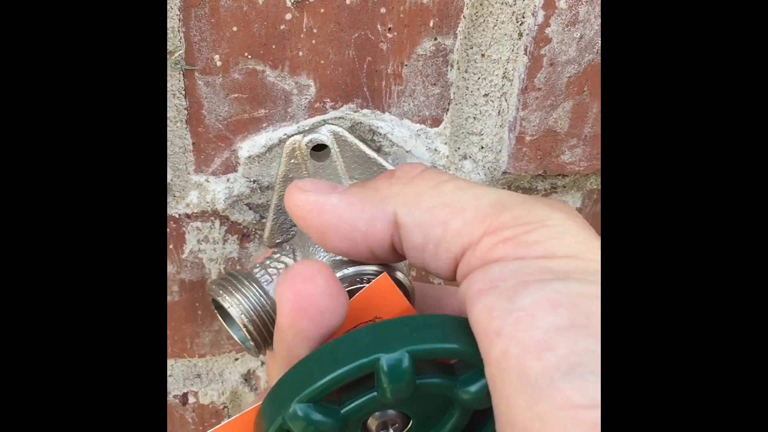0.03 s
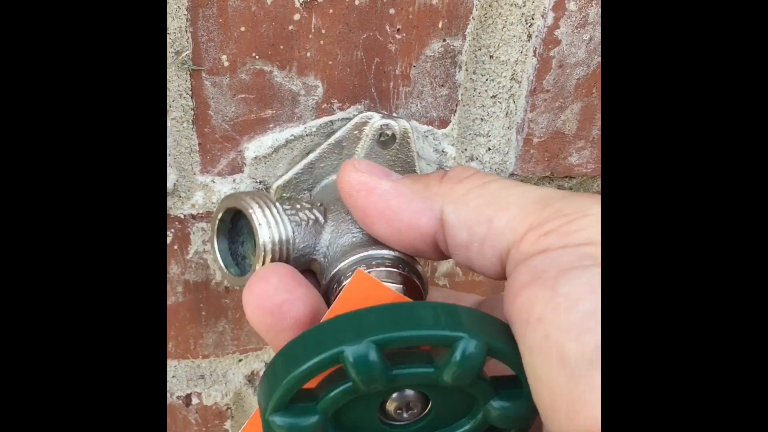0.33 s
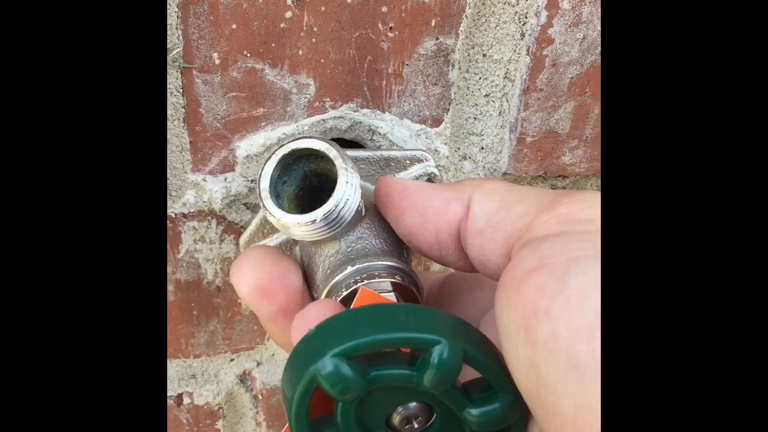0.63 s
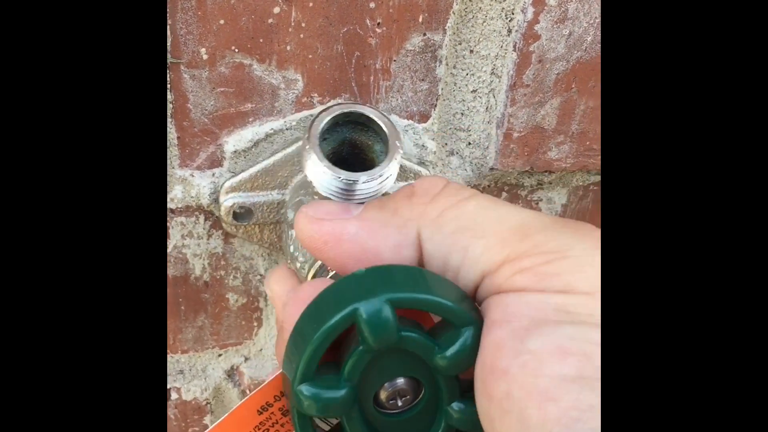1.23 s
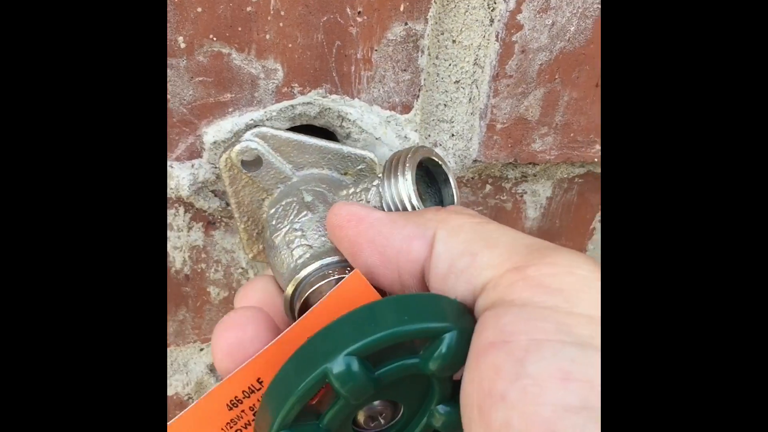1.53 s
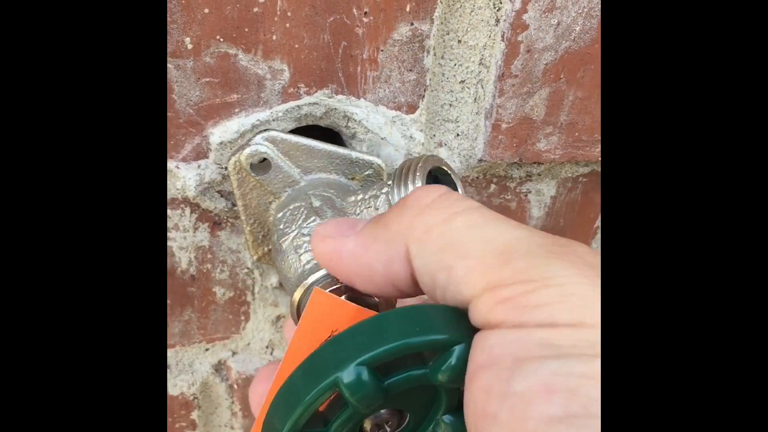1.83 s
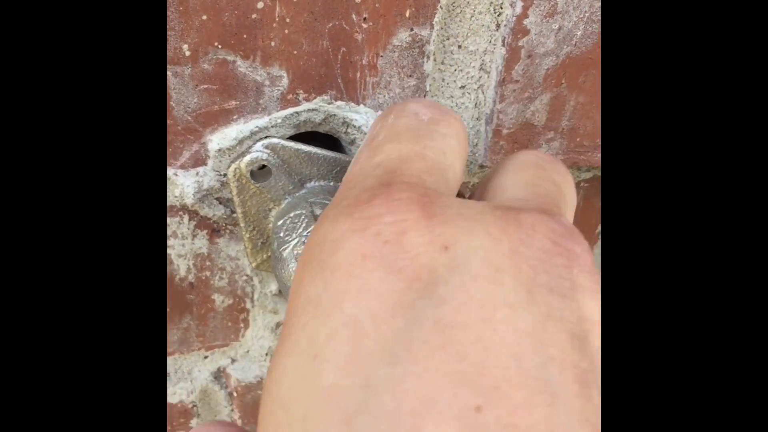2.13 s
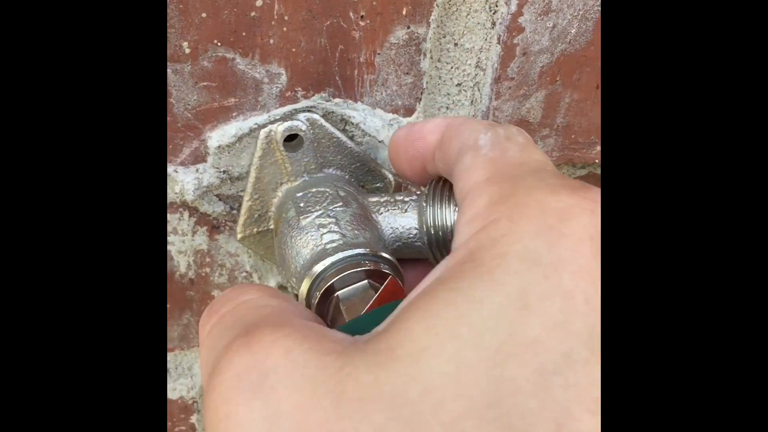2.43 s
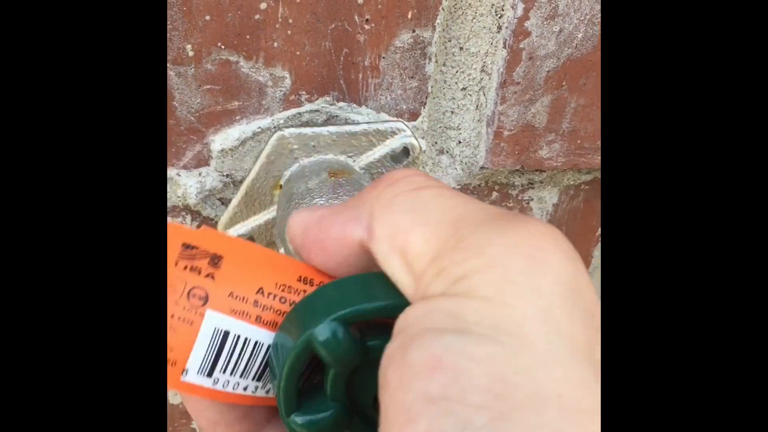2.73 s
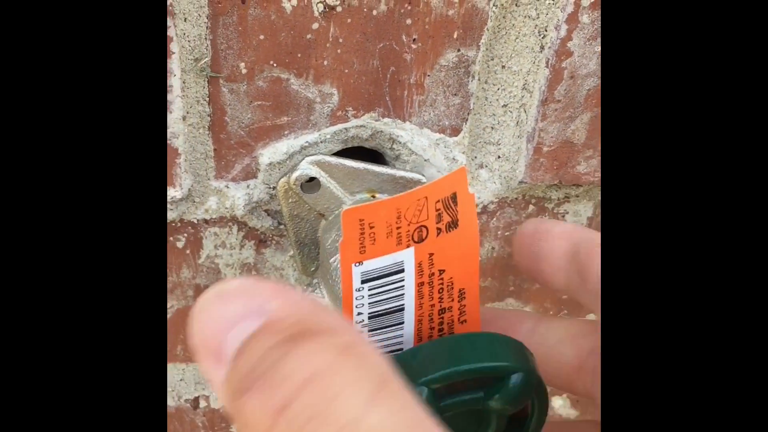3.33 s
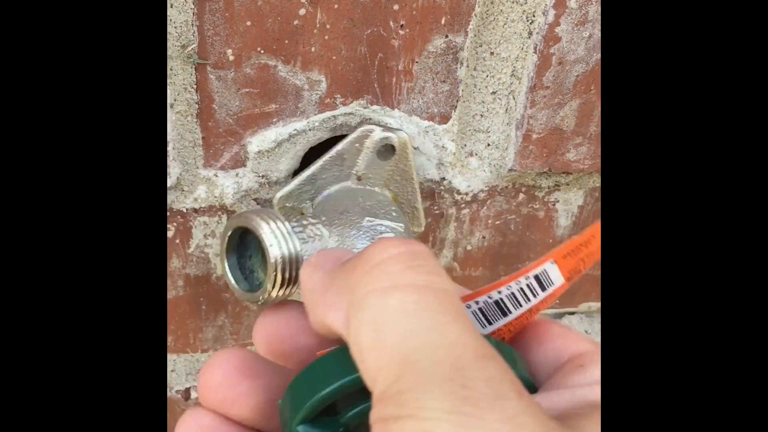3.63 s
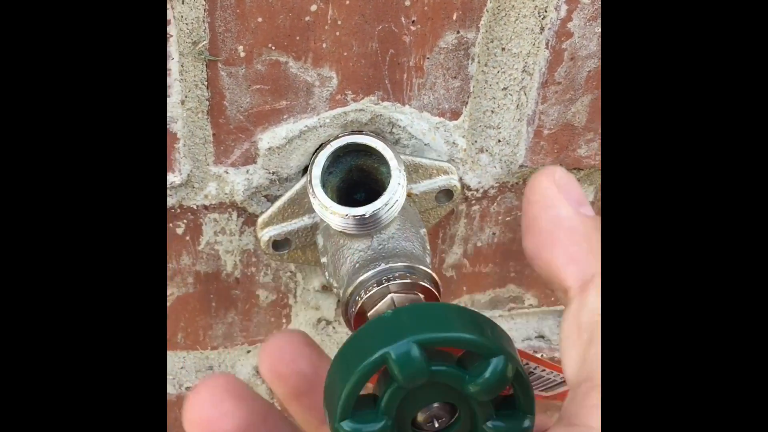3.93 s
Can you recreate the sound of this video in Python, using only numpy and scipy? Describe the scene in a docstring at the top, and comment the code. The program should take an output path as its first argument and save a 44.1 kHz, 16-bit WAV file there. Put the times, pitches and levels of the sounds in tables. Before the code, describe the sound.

A loose metal faucet is twisted in a brick wall, close up, over low outdoor rumble and faint hiss. It scrapes lightly and clinks around 0.5 seconds, then the pipe knocks hard and thuds at 1.5. From 2.2 seconds gritty grinding thickens with ringing clinks, ticks and thin squeaks, up to a second hard knock just after 3. After a short lull, grinding and clinking return from 3.6 to 4.

```python
"""A loose metal faucet is twisted by hand in its hole in a brick wall, close up, over low outdoor rumble.
First its flange scrapes lightly over mortar and clinks, ringing the casting; at 1.5 s the pipe knocks
hard and thuds in the wall. From 2.2 s the grinding thickens, with clinks, thin squeaks and ticks of the
handle and its card tag, up to a second hard knock just after 3 s, while a faint hiss sinks away.
After a short lull, a last bout of grinding, clinking and ticking starts at 3.6 s."""
import sys
import numpy as np
from scipy import signal
from scipy.fft import rfft, irfft
from scipy.io import wavfile

SR = 44100
rng = np.random.default_rng(int(sys.argv[2]) if len(sys.argv) > 2 else 0)


def digitize_waveform(pressure):
    """Quantize a signal to 16-bit integers and store it at the path in sys.argv[1].

    Rows of a 2-D input are taken as channels; values are limited to [-1, 1].
    """
    field = np.atleast_2d(pressure).T
    bounded = np.clip(field, -1, 1)
    quanta = np.round(bounded * 32767).astype(np.int16)
    wavfile.write(sys.argv[1], SR, quanta)


N = 176400

# Twists of the flange on mortar: (start [s], length [s], peak position [0-1], grit level [dB],
# ring level [dB], flange side [0-1], brightness [dB/octave])
TWISTS = [(0, 0.052, 0.7, -54, -76, 1, 3), (0.151, 0.16, 0.3, -54, -74, 0.7, 4.5),
          (0.322, 0.16, 0.3, -59.5, -73, .8, 1.5), (0.457, 0.12, 0.34, -48.5, -60.5, 0.8, -2),
          (0.717, 0.053, 0.4, -60, -74, .5, 3.5), (0.861, 0.055, .5, -65, -64.5, 0.7, 9),
          (1.075, 0.074, 0.47, -52.5, -65.5, 1, 3.5), (1.327, 0.17, 0.18, -56.5, -59.5, .5, -3),
          (2.18, 0.12, 0.88, -49.5, -67, .5, 2), (2.312, 0.086, .35, -49.5, -58, 0.7, 6.5),
          (2.411, 0.063, 0.67, -49, -57, 0.5, -4), (2.478, 0.53, 0.12, -59.5, -64, .1, -5.5),
          (2.674, 0.17, 0.43, -46, -55.5, .1, -1.5), (2.819, .12, 0.56, -42.5, -49.5, 0.6, -3.5),
          (2.928, 0.11, .75, -46.5, -59.5, 0.4, 0), (3.057, 0.1, 0.15, -50, -76, .5, -3),
          (3.622, 0.21, 0.2, -46, -54.5, 0.5, -4), (3.75, .17, 0.53, -43, -54, 0.5, -.5),
          (3.937, 0.045, 0.7, -45, -73, 0.68, 2)]
# EQ of the grit: (frequency [Hz], gain [dB])
GRIT_EQ = [(30, -40), (120, -12.5), (400, 0.5), (750, -5.5), (1270, 1.5), (1600, 1), (2200, -3.5),
           (2780, -3), (3400, -5), (4200, -3.5), (5500, -10.5), (8500, -15.5), (12000, -23.5), (16000, -25)]
GRIT_RIPPLE_DB, GRIT_RIPPLE_HZ = 4.5, 130

def scrape(start, length, peak, grit_db, ring_db, side, tilt_db):
    """One twist: grains crunch under the flange and keep the casting ringing."""
    size = SR // 4
    pressure = np.interp(np.arange(size) / SR / length, [0, peak, 1], [0, 1, 0]) ** 0.82
    force = grains(size)
    sound = casting(force * pressure, side)
    sound *= amp(ring_db) * np.linalg.norm(pressure) / np.linalg.norm(sound)
    grit = colour(ripple(force, GRIT_RIPPLE_DB, GRIT_RIPPLE_HZ), GRIT_EQ, tilt_db)
    sound[:size] += amp(grit_db) * grit * pressure
    return start, sound


def grains(size, per_second=1300, spread_db=1.5, clump_db=3, clump_s=0.00698):
    """Clumped clicks of sand grains catching and breaking."""
    breaks = rng.random(size) < per_second / SR
    strength = np.minimum(rng.exponential(1, size), 4)
    sign = rng.choice([-1., 1.], size)
    return unit(breaks * sign * amp(spread_db * strength + clump_db * wander(size, clump_s)))


# Flange hits on brick: (time [s], drive [dB], flange side [0-1], ring length [x], chatter [s])
FLANGE_CLINKS = [(.470, -52, 0.6, 0.45, .003), (.508, -36, 0.8, 0.57, 0.0032),
                 (0.52, -40.5, 0.7, .5, 0.0016), (.536, -44, 0.8, .5, 0.0023),
                 (1.776, -37.5, 0.52, 0.6, 0.0016), (2.338, -35.5, 0.08, 0.43, 0.0021),
                 (2.350, -46, 0.4, 0.19, 0.0049), (2.4955, -45, 0.5, 0.6, .0012),
                 (2.505, -52, 0, 0.45, 0.0014), (2.542, -44, 0.08, 0.27, 0.0011),
                 (2.554, -47, .1, 0.28, 0.0018), (2.587, -33, 0.38, 0.21, 0.0031),
                 (2.6238, -43, 0.3, 0.54, .0013), (2.668, -31, 0.35, 0.85, 0.0017),
                 (2.674, -23, 0, 0.45, 0.0014), (2.688, -33.5, 0.5, 1.33, 0.0026),
                 (2.744, -44.5, 0.3, 0.43, 0.0016), (2.787, -47, 0.03, .6, 0.0025),
                 (2.810, -39, 0.45, 0.5, 0.00072), (2.826, -40, 0.2, 0.78, 0.0018),
                 (2.854, -33.5, 0.3, 1.53, 0.0011), (2.964, -41, 0.4, 0.68, 0.00095),
                 (3.094, -54, 0.9, .4, 0.0016), (3.137, -44.5, 0.73, 0.53, .002),
                 (3.252, -52.5, 0.6, .4, 0.0014), (3.597, -42, 0.55, 0.3, 0.0057),
                 (3.632, -55, 0.5, .8, 0.0023), (3.673, -56, 0.8, 0.67, 0.0016),
                 (3.714, -43.5, 0.9, 0.55, 0.003), (3.755, -49, 0.9, 0.41, 0.0014),
                 (3.787, -46, 0.7, 1.1, 0.0014), (3.8528, -32.5, 0.8, 0.76, 0.0014),
                 (3.861, -39, 1, 0.93, 0.0023)]

def clink(start, db, side, ring, chatter):
    """The flange slips and chatters against brick for a few milliseconds, ringing the casting."""
    age = np.arange(SR // 30) / SR / chatter
    force = rng.standard_normal(len(age)) * (age * np.exp(-age)) ** 2
    return start, amp(db) * casting(force, side, ring) / 2


# The faucet's metallic ring, struck from either side of the flange:
# (frequency [Hz], level from side 0 [dB], level from side 1 [dB], t60 at ring length 1 [s])
CASTING_MODES = [(2900, -7.5, -17, 0.039), (4245, -8.5, -5, 0.19), (4510, 4, -14, 0.039),
                 (6210, -12, -4, 0.049), (7000, -1, -13, 0.17), (7200, 1, -14, 0.059), (8730, 1, 1, 0.037),
                 (8900, -15, -22, 0.015), (9495, -11.5, -16, 0.13), (9685, 3, 1.5, 0.053),
                 (10330, -6, -17, 0.022), (10450, -3, -24.5, 0.23), (11000, -2, -14, 0.043),
                 (12320, 3, -16.5, 0.077), (12550, -25, -8, .03), (12700, -16, 2, .055),
                 (14100, -17, 1, 0.049), (15360, -1.5, -3, 0.03), (14650, 3, -14, 0.03)]

def casting(force, side, ring=1, attack_s=0.00043, detune=.002, spread_db=4.5):
    """A force rings the faucet's modes, a little differently each time; a low ring is a damping grip."""
    t = np.arange(SR // 3) / SR
    attack = 1 - np.exp(-t / attack_s)
    sound = 0
    for hz, side0_db, side1_db, t60 in CASTING_MODES:
        pitch = hz * (1 + detune * rng.standard_normal())
        mode = attack * np.exp(-np.log(1000) * t / (t60 * ring)) * np.sin(2 * np.pi * pitch * t)
        rung = signal.fftconvolve(force, mode)
        gain = amp(side0_db + side * (side1_db - side0_db) + spread_db * rng.standard_normal())
        sound += gain * rung * np.linalg.norm(mode) / np.linalg.norm(rung)
    return sound


# Dry knocks and ticks of pipe, handle and tag:
# (time [s], tone level [dB], pitch [Hz], decay [s], crunch level [dB], crunch decay [s])
DRY_KNOCKS = [(.203, -24, 4800, 0.00064, -47, .005), (.499, -31, 4060, 0.00094, -65, 0.0032),
              (0.51, -48, 3000, 0.00059, -66, 0.0056), (1.507, -7.5, 2970, 0.0004, -39.5, 0.0061),
              (1.525, -27, 2050, 0.0011, -41.5, 0.01), (1.7774, -23.5, 2830, 0.00075, -44.5, 0.0074),
              (2.195, -43, 3250, 0.00034, -40.5, 0.0027), (2.244, -34, 1380, .001, -36, 0.0043),
              (2.2477, -39, 3160, 0.00025, -30.5, 0.0022), (2.266, -33, 1280, 0.0013, -46, .005),
              (2.284, -44, 3000, .0006, -47.5, 0.0018), (2.645, -40, 2640, .001, -50, .003),
              (2.675, -31, 4750, 0.0021, -41, 0.0046), (2.883, -21.5, 4540, 0.00062, -53, 0.0026),
              (2.965, -24.5, 4460, 0.0012, -50, .002), (3.0602, -5.5, 2760, 0.00044, -37.5, 0.0055),
              (3.139, -27.5, 2470, 0.00055, -41.5, 0.0031), (3.1813, -37, 3000, .0005, -46, 0.0091),
              (3.2185, -25, 1670, 0.0016, -55, 0.007), (3.231, -43, 1580, 0.0062, -62, 0.0033),
              (3.254, -42, 6800, 0.0022, -53, 0.004), (3.578, -35, 3600, .0005, -45.5, 0.0012),
              (3.606, -39, 3100, 0.0009, -44.5, .003), (3.64, -41, 2000, 0.0014, -50.5, 0.006),
              (3.756, -38, 2820, .001, -53, 0.0041), (3.809, -24.5, 2830, 0.00095, -39, 0.0046),
              (3.883, -34, 2025, 0.0022, -41, 0.0061), (3.897, -26, 4170, 0.0005, -48, 0.0046),
              (3.9234, -32.5, 2050, 0.0012, -50, 0.0042), (3.9689, -29, 2140, 0.0011, -43, 0.0012),
              (3.986, -32, 2100, .0015, -56, 0.0035)]
# The pipe's body under every knock: (frequency [Hz], level relative to the tone [dB], decay [s])
PIPE_MODES = [(441, -31, 0.019), (1258, -33, 0.0067), (4140, -14.5, 0.00091)]
# EQ of the mortar crunch: (frequency [Hz], gain [dB])
CRUNCH_EQ = [(300, -4), (1200, -0.5), (2500, 4), (4200, 2), (5800, -4), (8000, -11), (12000, -18),
             (16000, -16)]

def knock(start, db, hz, decay, crunch_db, crunch_decay, attack_s=0.00039):
    """A hard, damped contact that the pipe answers, with a short tail of crunching mortar."""
    t = np.arange(SR // 16) / SR
    attack = 1 - np.exp(-(t / attack_s) ** 2)
    modes = [(hz, 0, decay), *PIPE_MODES]
    ring = sum(amp(level) * np.sin(2 * np.pi * f * t) * np.exp(-t / tau) for f, level, tau in modes)
    grit = ripple(rng.standard_normal(len(t)), GRIT_RIPPLE_DB, GRIT_RIPPLE_HZ)
    crunch = colour(grit, CRUNCH_EQ) * np.exp(-t / crunch_decay)
    return start, attack * (amp(db) * ring + amp(crunch_db) * crunch)


# Low thuds of the pipe: (time [s], attack [s], decay [s], level [dB], pitch [Hz], noise share [0-1])
PIPE_THUDS = [(.50, 0.029, 0.049, -37.5, 193, 0.76), (.73, 0.0051, 0.029, -39, 198, 1),
              (1.524, 0.027, 0.023, -34, 202.7, 0.64), (1.775, 0.014, 0.037, -41, 168.6, 0.64),
              (2.32, 0.031, 0.036, -34, 185.3, 0.92), (2.429, 0.04, 0.016, -42.5, 278, 0.62),
              (2.69, 0.13, 0.36, -44, 183, 0.93), (3.008, 0.0092, 0.026, -33, 154.6, 0.42),
              (3.061, 0.0091, 0.016, -37, 314, 0.9), (3.10, 0.019, 0.021, -38.5, 176.5, 0.5),
              (3.66, 0.18, .04, -37.5, 168, 0.96)]
# Pitch-tracking EQ of the rattle: (frequency [x pitch], gain [dB])
RATTLE_EQ = [(.1, -36), (.3, -10), (.6, -3.5), (1, 0), (1.35, -7), (2.2, -13), (3.5, -25), (8, -33),
             (25, -68)]

def thud(start, attack, decay, db, hz, noise_share):
    """The pipe judders in the wall: one low mode in a dull rattle."""
    t = np.arange(SR // 2) / SR
    envelope = np.minimum(t / attack, 1) * np.exp(-np.maximum(t - attack, 0) / decay)
    rattle = colour(rng.standard_normal(len(t)), [(ratio * hz, gain) for ratio, gain in RATTLE_EQ])
    tone = unit(np.sin(2 * np.pi * hz * t))
    body = envelope * (np.sqrt(noise_share) * rattle + np.sqrt(1 - noise_share) * tone)
    return start, amp(db) * body * np.linalg.norm(envelope) / np.linalg.norm(body)


# Singing metal: (start [s], length [s], first pitch [Hz], last pitch [Hz], bandwidth [Hz], level [dB])
METAL_SQUEAKS = [(1.324, 0.13, 1270, 1240, 155, -61), (1.59, 0.33, 1047, 1057, 40, -62),
                 (2.419, 0.28, 1850, 1684, 164, -56), (2.486, .03, 4400, 4450, 200, -50),
                 (2.535, 0.02, 4480, 4620, 210, -51.5), (2.587, 0.011, 4550, 4620, 190, -42),
                 (2.828, .17, 4245, 4220, 12.3, -51), (3.635, 0.28, 2740, 2840, 150, -53.5),
                 (3.669, 0.087, 6150, 6060, 134, -58.5)]

def squeak(start, length, first_hz, last_hz, width, db):
    """A thin, unsteady friction tone that glides as it swells and fades."""
    progress = np.arange(0, length, 1 / SR) / length
    glide = first_hz + (last_hz - first_hz) * progress
    return start, amp(db) * np.sin(np.pi * progress) * unsteady(glide, width)


# EQ of the outdoor bed: (frequency [Hz], gain [dB])
RUMBLE_EQ = [(20, -40), (35, -26), (48, -6), (58, -4), (78, -4.5), (118, -2), (150, -8.5), (195, -5.5),
             (270, -14), (430, -30.5), (750, -33.5), (1020, -28.5), (1500, -37), (3000, -38.5),
             (5500, -54.5), (9500, -51.5), (16000, -58.5)]
# Drone in the bed: (pitch [Hz], level [dB])
HUM_TONES = [(58.5, -52.5), (118, -53.5)]

def rumble(noise_db=-48, hum_width_hz=7):
    """Steady, bass-heavy outdoor noise with two wavering hum tones."""
    noise = amp(noise_db) * colour(rng.standard_normal(N), RUMBLE_EQ)
    hum = sum(amp(db) * unsteady(np.full(N, hz), hum_width_hz) for hz, db in HUM_TONES)
    return noise + hum


# EQ of the hiss: (frequency [Hz], gain [dB])
HISS_EQ = [(1500, -1), (2800, -4.5), (3300, 3.5), (3800, 2), (4250, 7), (4900, -4.5), (6000, 0.5),
           (7400, -6), (8500, 0.5), (9400, -13.5), (12000, -12.5), (16000, -14)]
# Fader ride of the hiss: (time [s], level [dB])
HISS_FADER = [(0, -61), (.7, -61.5), (1.5, -60), (2.15, -61.5), (2.5, -61.5), (3.2, -73), (4, -68.5)]

def hiss(hop_s=.18):
    """Faint hiss that dips in the second half; crossfaded noise patches make its colour drift."""
    bed = np.zeros(N + SR)  # one second of pre-roll
    size = round(2 * hop_s * SR)
    window = np.sin(np.pi * np.arange(size) / size)
    for start in np.arange(0, N / SR + 1, hop_s):
        add(bed, start, window * ripple(rng.standard_normal(size), depth_db=3.4, spacing_hz=80))
    fader_db = np.interp(np.arange(N) / SR, *np.transpose(HISS_FADER))
    return colour(bed[SR:], HISS_EQ) * amp(fader_db)


def amp(db):
    """Decibels to gain."""
    return 10 ** (np.asarray(db) / 20)


def unit(x):
    """Scales to rms 1."""
    return x / np.sqrt(np.mean(x ** 2) + 1e-20)


def add(mix, start, sound):
    """Mixes a sound in at start seconds."""
    part = mix[max(round(start * SR), 0):][:len(sound)]
    part += sound[:len(part)]


def colour(x, eq, tilt_db=0):
    """EQ through (frequency [Hz], gain [dB]) points, plus a tilt per octave; rms 1."""
    hz, db = np.transpose(eq)
    octave = np.log2(np.fft.rfftfreq(len(x), 1 / SR) + 1)
    curve = np.interp(octave, np.log2(hz), db)
    tilt = tilt_db * np.clip(octave, np.log2(hz[0]), np.log2(hz[-1]))
    return unit(irfft(rfft(x) * amp(curve + tilt), len(x)))


def ripple(x, depth_db, spacing_hz):
    """Many small, close resonances: random peaks and dips in the spectrum."""
    hz = np.fft.rfftfreq(len(x), 1 / SR)
    bumps = np.interp(hz / spacing_hz, np.arange(2048), rng.standard_normal(2048))
    return irfft(rfft(x) * amp(depth_db * bumps), len(x))


def wander(size, step_s):
    """Smooth random modulation with a spread of about 1."""
    steps = np.arange(size) / (step_s * SR)
    return np.interp(steps, np.arange(4096), rng.standard_normal(4096))


def unsteady(hz, width):
    """A tone along the curve hz whose strength and phase drift; rms 1."""
    drift = wander(len(hz), .5 / width) + 1j * wander(len(hz), .5 / width)
    return unit((drift * np.exp(2j * np.pi * np.cumsum(hz) / SR)).real)


def scene():
    """Every faucet cue laid over the outdoor bed, in mono."""
    mix = rumble() + hiss()
    layers = [(clink, FLANGE_CLINKS), (knock, DRY_KNOCKS), (thud, PIPE_THUDS),
              (scrape, TWISTS), (squeak, METAL_SQUEAKS)]
    for source, cues in layers:
        for cue in cues:
            add(mix, *source(*cue))
    return mix[None]


def record(dry):
    """A steep high cut just under 16 kHz."""
    high_cut = signal.firwin(511, 15950, window=("kaiser", 9), fs=SR)
    return signal.oaconvolve(dry, high_cut[None], "same")


dry = scene()
out = record(dry)
digitize_waveform(out)
```